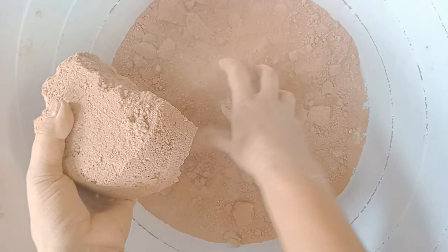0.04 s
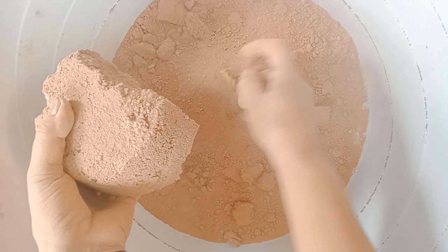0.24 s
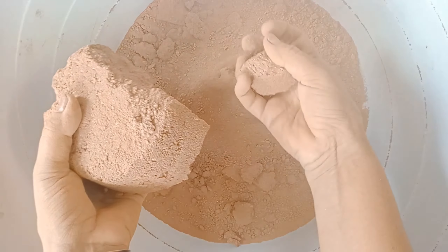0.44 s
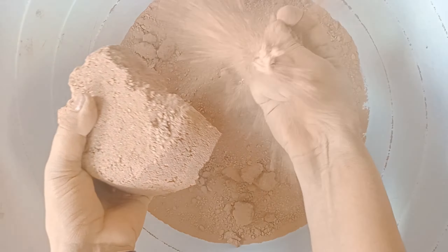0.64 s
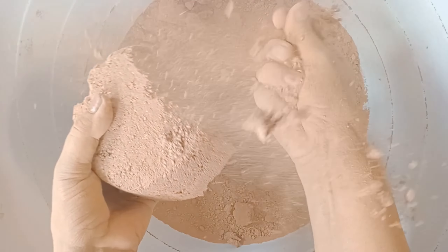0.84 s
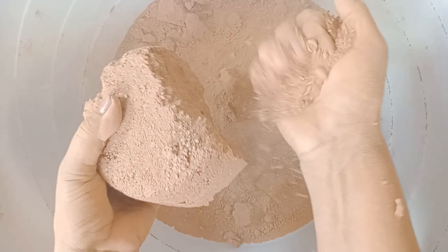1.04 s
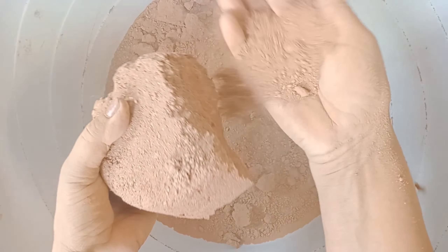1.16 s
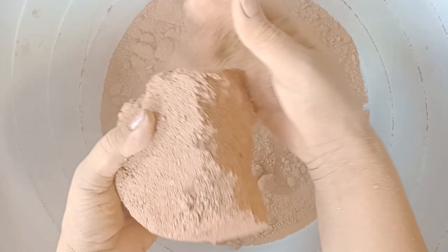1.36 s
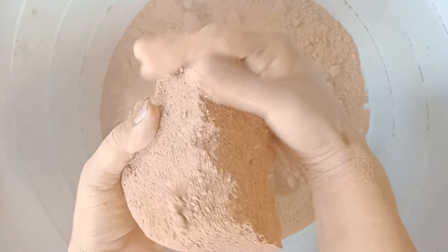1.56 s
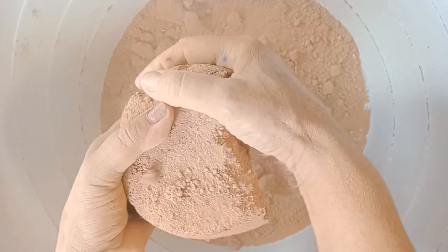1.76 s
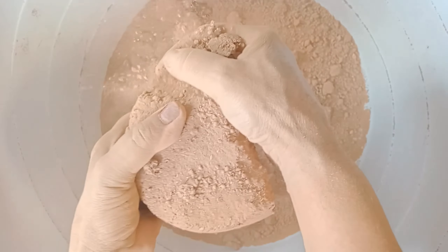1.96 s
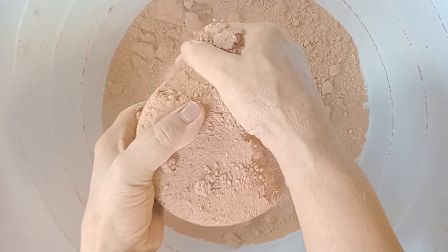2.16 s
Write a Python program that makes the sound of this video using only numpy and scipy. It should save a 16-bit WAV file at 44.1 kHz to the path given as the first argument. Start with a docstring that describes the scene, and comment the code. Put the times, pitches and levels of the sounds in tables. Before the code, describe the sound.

A hand crushes a lump of dry sandy cement close up, in gritty bursts from about 0.2 seconds, with the loudest crack at 0.6. Sand and crumbs trickle into a basin, with two hollow thuds around 0.7 and 0.8 seconds. From 1 second, skin rubs off grit in several strokes, with smaller cracks near 1.6 and 1.9 and light thuds around 2 seconds, in a small room.

```python
"""In a small room, close up over a basin, a hand crushes a lump of dry sandy cement.
The lump gives way in bursts of tiny breaking grains, and its cracks ring in the hollow of the hand.
Sand and crumbs trickle onto the powder below, and lumps and hands thud against the basin or a larger
block. Skin rubs grit off the cement in several strokes, over the dull noise of the moving hands."""
import sys
import numpy as np
from scipy import signal
from scipy.io import wavfile

SR = 44100
rng = np.random.default_rng(int(sys.argv[2]) if len(sys.argv) > 2 else 0)


def log_audio(samples):
    """Write samples as a 16-bit WAV file to the path given in sys.argv[1]."""
    # one column per channel
    frames = np.atleast_2d(samples).T
    # limit to full scale, then quantise
    limited = np.clip(frames, -1, 1)
    pcm = np.round(limited * 32767).astype(np.int16)
    wavfile.write(sys.argv[1], SR, pcm)


N = 97020
T = np.arange(N) / SR

# tone of fine grit: pitch_hz, level_db
FINE_GRIT = [(100, -44), (400, -17.5), (650, -6), (1000, -17.5), (1550, -10), (2300, 0.5), (3600, -2),
             (5000, -9.5), (6600, -12), (8200, -6.5), (9300, -2), (10600, -13), (12200, -13.5),
             (14000, -13.5), (16000, -19)]
# tone of coarse grit: pitch_hz, level_db
COARSE_GRIT = [(100, -35), (350, -22.5), (620, -4.5), (1150, 0), (1600, -3.5), (2200, 0), (3500, 0.5),
               (4500, -7), (6200, -24.5), (9200, -15), (11500, -23.5), (16000, -22)]


def amp(db):
    """Turns decibels into a gain to multiply by."""
    return 10 ** (np.asarray(db) / 20)


def unit(x):
    """Scales a sound to an average (rms) level of 1."""
    return x / np.sqrt(np.mean(x ** 2) + 1e-20)


def at_pitch(points, hz):
    """Looks up a table between its rows, on a logarithmic pitch scale."""
    pitches, values = np.transpose(points)
    return np.interp(np.log(hz + 1), np.log(pitches), values)


def gain_curve(points):
    """Joins points of time and decibels into one gain for each sample."""
    return amp(np.interp(T, *np.transpose(points)))


def add(mix, start_s, sound):
    """Mixes a sound in at its start time."""
    part = mix[max(round(start_s * SR), 0):][:len(sound)]
    part += sound[:len(part)]


def colour(x, tone, size=2048):
    """Filters a sound to the given tone without smearing it earlier in time."""
    log_gain = np.log(amp(at_pitch(tone, abs(np.fft.fftfreq(size, 1 / SR)))))
    taps = np.fft.ifft(np.exp(np.conj(signal.hilbert(log_gain)))).real
    return signal.fftconvolve(x, taps / np.linalg.norm(taps))[:len(x)]


def low_cut(x, hz, order=3):
    """Turns down the bass below hz."""
    return signal.sosfilt(signal.butter(order, hz, "high", fs=SR, output="sos"), x)


def grains(tone, per_s, spread_db, grain_s, kinds=24):
    """A steady shower of tiny breaks, each a very short burst of noise of random strength."""
    strength = amp(spread_db * np.minimum(rng.exponential(1, N), 4))
    hits = strength * (rng.random(N) < per_s / SR)
    kind = rng.integers(0, kinds, N)
    shapes = rng.standard_normal((kinds, 128)) * np.exp(-T[:128] / grain_s)
    shower = sum(np.convolve(hits * (kind == k), unit(shapes[k]))[:N] for k in range(kinds))
    return unit(colour(shower, tone))


def ring(notes, rise_s):
    """Notes ring together after a blow, each dying away by 60 dB in its fade_s."""
    t = T[:SR // 8]
    out = sum(amp(db - 60 * t / fade_s) * np.sin(2 * np.pi * hz * t) for hz, db, fade_s in notes)
    out *= 1 - np.exp(-(t / rise_s) ** 2)
    return out / abs(out).max()


def snap(tone, decay_s, splinters):
    """One sharp break: a click with a brief spray of splinters."""
    t = T[:SR // 32]
    click = t == 0
    spray = splinters * rng.standard_normal(len(t)) * np.exp(-t / decay_s)
    out = colour(click + spray, tone)
    return out / abs(out).max()


def room_echo(x, size=256):
    """The basin and the room give a short blurred echo whose treble dies first."""
    # time the echo takes to fade by 60 dB: pitch_hz, fade_s
    fade_times = [(100, 0.46), (600, 0.3), (3000, 0.23), (8000, 0.15), (16000, 0.078)]
    hz, t, noise = signal.stft(rng.standard_normal(SR // 3), SR, nperseg=size)
    fade = amp(-60 * t / at_pitch(fade_times, hz)[:, None])
    tail = signal.istft(noise * fade, SR, nperseg=size)[1]
    tail *= np.minimum(T[:len(tail)] / 0.0028, 1)  # quick fade-in
    return signal.fftconvolve(x, tail / np.linalg.norm(tail))[:N]


def moving_hands():
    """The hands make a soft, dull noise as they move."""
    # loudness of the movement: time_s, level_db
    loudness = [(0, -59.5), (.1, -55.5), (.19, -56), (.26, -44.5), (.34, -50), (.6, -48), (.8, -51),
                (.97, -49.5), (1.2, -52), (1.3, -50), (1.42, -53.5), (1.8, -53), (1.93, -43), (2.0, -47.5),
                (2.09, -49.5), (2.2, -47.5)]
    # tone of the hands: pitch_hz, level_db
    tone = [(20, -23), (50, -22), (80, 1), (105, -1), (170, -1), (300, -3), (480, -13), (1000, -31),
            (4000, -41), (16000, -55)]
    return gain_curve(loudness) * unit(colour(rng.standard_normal(N), tone))


def falling_sand():
    """Sand and crumbs trickle into the basin as thousands of tiny hits."""
    # loudness of the trickle: time_s, level_db
    loudness = [(0, -58.5), (.17, -62), (.24, -50), (.3, -51.5), (.5, -37.5), (.62, -29), (.675, -26),
                (.75, -33.5), (.82, -31), (.9, -40), (.98, -51.5), (1.09, -44), (1.2, -49.5), (1.34, -45),
                (1.44, -52.5), (1.76, -46), (2.13, -41), (2.2, -47)]
    # tone of sand landing: pitch_hz, level_db
    tone = [(100, -22), (300, 1), (480, -5.5), (590, 4.5), (740, -8), (900, -6), (1450, -10.5), (2000, -4),
            (2650, -1.5), (3550, -3), (4500, -12), (6000, -21.5), (9200, -13.5), (11500, -21), (16000, -20)]
    return gain_curve(loudness) * grains(tone, per_s=3000, spread_db=1.5, grain_s=0.00046)


def rubbing(fade_db=-20):
    """Each stroke of skin swells, holds and eases off, scraping grains loose."""
    # strokes over grit: full_pressure_s, rise_s, hold_s, release_s, level_db, coarse_share_db
    strokes = [(.425, .05, 0.013, 0.049, -33.5, 3), (0.499, 0.039, 0.12, 0.095, -29, 3.5),
               (1.073, 0.028, 0.05, 0.11, -44.5, -32), (1.277, 0.09, 0.044, 0.086, -32.5, -7.5),
               (1.52, 0.062, 0.032, 0.032, -31.5, -4.5), (1.648, 0.041, 0.071, 0.15, -34.5, -2.5),
               (1.871, 0.055, 0.031, 0.098, -35, -2.5), (2.015, .04, 0.066, 0.07, -45.5, -4),
               (2.116, 0.036, 0.023, 0.074, -41, -14)]
    fine, coarse = np.zeros((2, N))
    for full_s, rise_s, hold_s, release_s, level_db, coarse_db in strokes:
        before = np.maximum((full_s - T) / rise_s, 0) ** 1.07
        after = np.maximum((T - full_s - hold_s) / release_s, 0)
        pressure = amp(level_db + fade_db * (before + after))
        fine += pressure
        coarse += pressure * amp(coarse_db)
    fine *= grains(FINE_GRIT, per_s=5000, spread_db=4, grain_s=0.00034)
    coarse *= grains(COARSE_GRIT, per_s=2200, spread_db=3.5, grain_s=0.00054)
    return fine + coarse


def thudding(low_cut_hz=210, deep_below_hz=400):
    """Lumps and hands hit the basin or block with hollow thuds that carry little bass."""
    # blows: start_s, level_db, size (1 is usual, larger sounds lower), deep_boost_db
    blows = [(.095, -44, 4.3, 28), (.2245, -24.5, 1.8, 14.5), (.266, -33, 1.48, 12),
             (.3725, -26, 0.98, -15), (.5025, -20.5, .9, -8), (.594, -25, 1.08, 6),
             (.6600, -8, 0.988, -0.5), (.7897, -8, 0.99, 0), (.803, -28, 0.92, 8), (.993, -22.5, 0.96, -1),
             (1.214, -27, 0.93, -2.5), (1.3124, -20.5, 0.998, 5.5), (1.898, -25.5, 1.04, 9),
             (2.0158, -22.5, 1.1, 0), (2.032, -26.5, 0.91, 5), (2.0655, -24, 1.02, 7.5),
             (2.088, -19, 1.09, 11), (2.102, -35, 0.9, 6)]
    # notes in a thud of size 1: pitch_hz, level_db, fade_s
    thud_notes = [(246, -20, 0.069), (335.6, -6, 0.084), (517, -4, 0.031), (587, 0.5, 0.042),
                  (898, -2.5, 0.024), (1040, -8.5, 0.0097)]
    out = np.zeros(N)
    for start_s, level_db, size, boost_db in blows:
        notes = [(hz / size, db + boost_db * (hz < deep_below_hz), fade_s)
                 for hz, db, fade_s in thud_notes]
        thud = low_cut(ring(notes, rise_s=0.00036), low_cut_hz / size)
        add(out, start_s, amp(level_db) * thud)
    return out


def crunching(attack_s=0.0013):
    """The lump gives way in sudden bursts that die away in fine and coarse grains."""
    # collapses: start_s, level_db, fade_s (to fall 60 dB), coarse_share_db
    collapses = [(0.071, -51, 0.32, -25), (0.121, -46.5, 0.01, -3), (0.142, -48.5, 0.17, -25),
                 (.18, -46, 0.5, -28), (0.2249, -25.5, 0.18, -5.5), (.313, -42, 0.2, 1),
                 (0.3313, -29, 0.16, -3.5), (0.371, -20, 0.15, 0), (0.43, -24.5, 0.09, -4),
                 (0.503, -25.5, 0.06, -1), (0.592, -23, 0.0748, -7), (0.656, -30, 0.13, 9),
                 (0.76, -33, 0.01, 7), (0.8065, -34.5, 0.04, 8), (0.9943, -27, 0.15, -5),
                 (1.214, -39.5, 0.63, -7), (1.476, -31.5, 0.08, -12), (1.644, -32.5, 0.16, -10),
                 (1.897, -32.5, 0.03, -1)]
    fine, coarse = np.zeros((2, N))
    for start_s, level_db, fade_s, coarse_db in collapses:
        force = amp(level_db - 60 * T / fade_s) * (1 - np.exp(-T / attack_s))
        add(fine, start_s, force)
        add(coarse, start_s, force * amp(coarse_db))
    fine *= grains(FINE_GRIT, per_s=7000, spread_db=4.0, grain_s=0.00059)
    coarse *= grains(COARSE_GRIT, per_s=4600, spread_db=2.5, grain_s=0.00082)
    return fine + coarse


def cracking():
    """Each crack has a sharp edge and rings the cupped hand; single hard grains snap with a tick."""
    # cracks in the lump: start_s, level_db, pitch_hz, edge_db
    cracks = [(.3340, -14, 1105, -34), (.3722, -11.5, 1113, -11.5), (0.4, -20, 1110, -28),
              (0.4332, -12.5, 1166, -21), (0.4904, -19, 1076, -22), (0.503, -8, 1018, -9),
              (0.5161, -12, 1140, -30), (0.569, -24, 1330, -17), (0.5933, 0.6, 1152, -11),
              (.6603, -21, 1100, -12), (.9930, -22, 920, -12), (1.6366, -23.5, 1150, -23),
              (1.646, -22, 1080, -18.5), (1.6692, -22.5, 1055, -26), (1.678, -20, 1060, -29),
              (1.898, -19, 1060, -15), (1.9099, -18, 1170, -14.5)]
    # notes of the hollow hand: pitch_ratio (times the crack's pitch), level_db, fade_s
    hand_notes = [(0.891, -4.5, 0.018), (1.069, 2, .013), (2.05, -7.5, 0.01)]
    # tone of a crack's sharp edge: pitch_hz, level_db
    edge_tone = [(100, -41), (700, -5.5), (1500, -6.5), (2400, 7), (3600, -9.5), (5500, -17.5),
                 (9000, -20.5), (16000, -16)]
    # hard grains snapping: start_s, level_db
    ticks = [(.031, -47), (0.069, -37), (0.3327, -23.5), (0.429, -18.5), (0.5922, -5.5), (.5930, -7.5),
             (.761, -14), (0.8082, -21.5), (0.861, -26), (1.6436, -18), (1.897, -19.5)]
    # tone of a snapping grain: pitch_hz, level_db
    tick_tone = [(100, -11.5), (1500, -15), (3000, -10.5), (5500, -16.5), (7800, -11), (9100, 3.5),
                 (11000, -15), (16000, -24)]
    out = np.zeros(N)
    for start_s, level_db, pitch_hz, edge_db in cracks:
        notes = [(pitch_hz * ratio, db, fade_s) for ratio, db, fade_s in hand_notes]
        knock = low_cut(ring(notes, rise_s=0.00087), hz=454)
        add(out, start_s, amp(level_db) * knock)
        add(out, start_s, amp(edge_db) * snap(edge_tone, decay_s=0.0015, splinters=0.32))
    for start_s, level_db in ticks:
        add(out, start_s, amp(level_db) * snap(tick_tone, decay_s=0.0021, splinters=0.26))
    return out


def scene(echo_db=-11):
    """Mixes sand, hands and cement into one channel; only the cement sounds get an echo."""
    background = falling_sand() + moving_hands()
    cement = crunching() + rubbing() + cracking() + thudding()
    return (background + cement + amp(echo_db) * room_echo(cement))[None]


def record(dry, cutoff_hz=15750):
    """Clips peaks at full scale, then removes the highest treble."""
    lowpass = signal.firwin(401, cutoff_hz, window=("kaiser", 8), fs=SR)
    return signal.oaconvolve(np.clip(dry, -1, 1), lowpass[None], "same")


dry = scene()
out = record(dry)
log_audio(out)
```